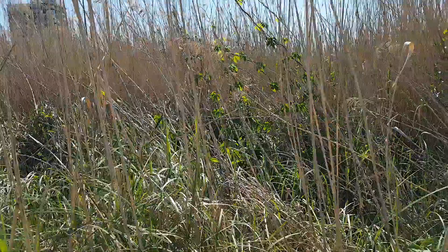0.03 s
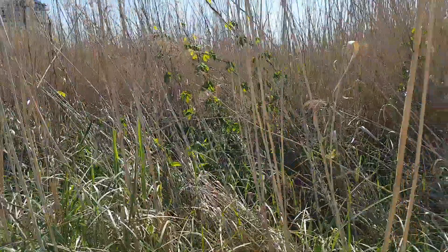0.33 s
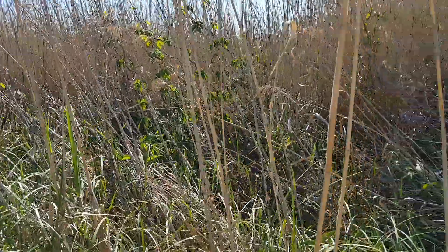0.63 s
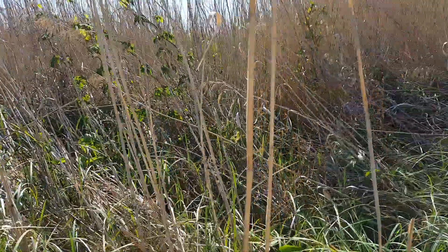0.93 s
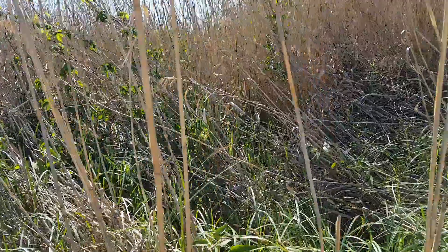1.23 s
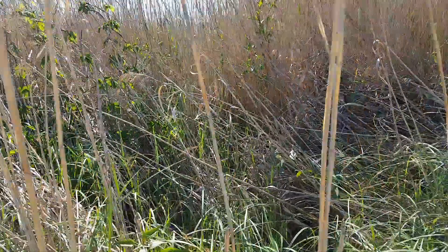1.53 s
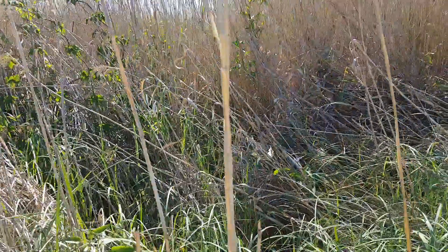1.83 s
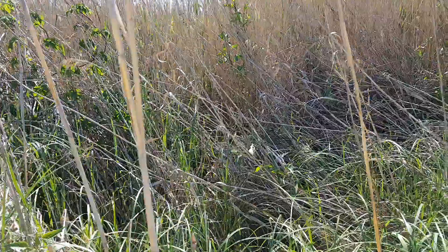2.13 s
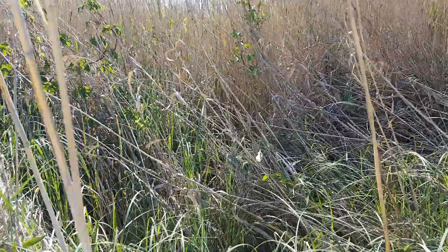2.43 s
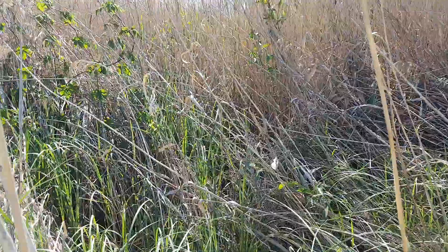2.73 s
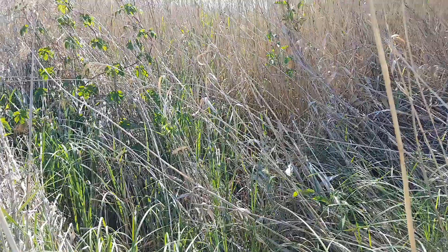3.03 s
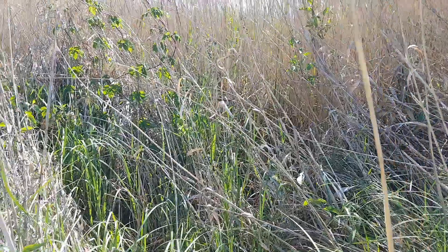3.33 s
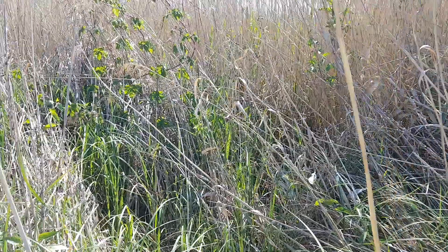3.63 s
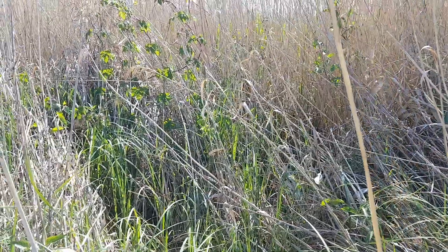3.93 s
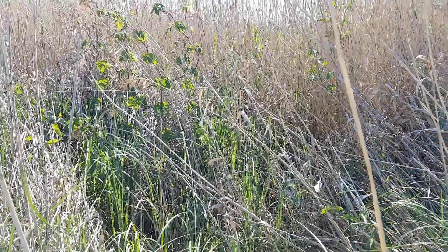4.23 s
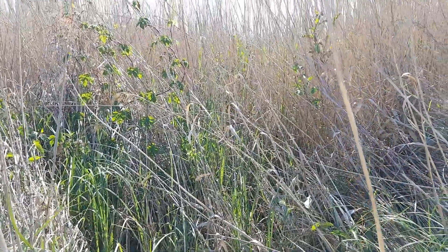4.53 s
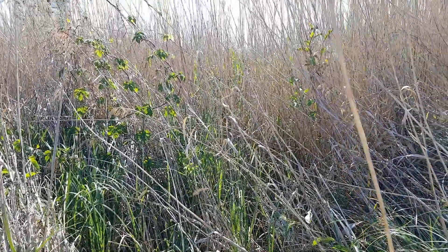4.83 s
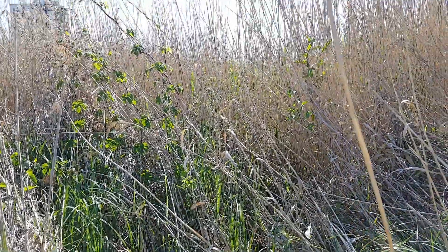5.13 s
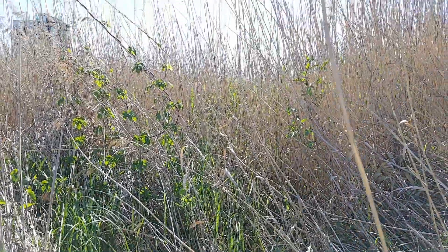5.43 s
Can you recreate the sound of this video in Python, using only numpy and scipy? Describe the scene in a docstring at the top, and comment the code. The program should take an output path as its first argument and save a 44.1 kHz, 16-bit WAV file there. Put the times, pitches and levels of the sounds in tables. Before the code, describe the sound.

A chorus of water frogs croaks from a reed bed beside a lake, heard from the bank. Short, buzzy, rattling calls overlap many times a second without a break, each with a brief echo off the stems. Distant frogs blur into a soft wash with a faint hiss. Dry reeds rustle very faintly a few times, and a quiet low rumble grows about halfway through. The chorus shifts slightly sideways as the microphone turns.

```python
"""A reed bed by a lake: a chorus of water frogs, heard from the bank through slowly turning microphones.
Each croak is a short run of clicks from the vocal cords. The clicks slow down as they go and ring
the frog's swelling vocal sacs, the air pouches beside its mouth. The stems scatter the calls.
A low outdoor rumble, far-off frogs and a faint hiss lie underneath, and now and then dry reeds rustle."""
import sys
import numpy as np
from scipy import signal
from scipy.fft import rfft, irfft
from scipy.io import wavfile
from scipy.ndimage import map_coordinates

SR = 44100
rng = np.random.default_rng(int(sys.argv[2]) if len(sys.argv) > 2 else 0)


def unload_audio(sound):
    """Save the sound as a 16-bit wav file, at the path given as the first command line argument."""
    columns = np.transpose(np.atleast_2d(sound))
    # keep every value between -1 and 1, then stretch to whole-number steps
    steps = np.round(np.clip(columns, -1, 1) * 32767)
    wavfile.write(sys.argv[1], SR, steps.astype(np.int16))


N = 245637


def gain_of(db):
    """Turns decibels (dB) into a number to multiply a sound by."""
    return 10 ** (np.asarray(db) / 20)


def evened(x):
    """Scales a sound to an average power of one."""
    return x / np.sqrt(np.mean(x ** 2) + 1e-20)


def at_pitch(table, hz):
    """Looks up a table by frequency, sliding between rows on a musical (logarithmic) scale."""
    row_hz, value = np.transpose(table)
    return np.interp(np.log(hz + 1), np.log(row_hz + 1), value)


def at_time(table, seconds):
    """Looks up a table by time, sliding between rows."""
    return np.interp(seconds, *np.transpose(table))


def add(mix, start, sound):
    """Mixes a sound in at a start time in seconds."""
    part = mix[max(round(start * SR), 0):][:len(sound)]
    part += sound[:len(part)]


def colour(x, tone, size=4096):
    """Shapes bass and treble by a table of Hz and dB; white noise keeps its power."""
    hz = abs(np.fft.fftfreq(size, 1 / SR))
    log_gain = np.log(evened(gain_of(at_pitch(tone, hz))))
    response = np.exp(np.conj(signal.hilbert(log_gain)))  # rings after a click, never before
    taps = np.fft.ifft(response).real
    return signal.oaconvolve(x, taps[:size // 2])[:N]


def resonate(x, hz, width_hz):
    """Rings at a pitch that can move: shift that pitch down to zero, smooth twice, shift back."""
    turn = np.exp(2j * np.pi * np.cumsum(hz) / SR)
    decay = np.exp(-np.pi * width_hz / SR)
    smoothed = signal.lfilter([(1 - decay) ** 2], [1, -2 * decay, decay * decay], x / turn)
    return (turn * smoothed).real


def swell(progress):
    """A push that builds over the first two fifths, then ebbs; progress runs from 0 to 1."""
    return np.abs(np.sin(np.pi * progress ** 0.79)) ** 0.66


def wash(tone, apart):
    """Shaped noise, partly different at the two microphones."""
    shared, side = (colour(rng.standard_normal(N), tone) for _ in range(2))
    return evened(np.array([shared + apart * side, shared - apart * side]))


def vocal_cords(rate_hz, chance, limp, jitter=.11, shimmer_db=2):
    """One slightly uneven click per opening of the cords; every second click fades, making a rattle."""
    turns = np.cumsum(rate_hz) / SR
    cycle = np.arange(min(int(turns[-1] + .5), len(chance)))
    click_at = np.interp(cycle + .5 + jitter * chance[cycle, 0], turns, np.arange(len(turns)))
    weakening = np.minimum(limp * click_at / len(turns), 1) * (cycle % 2)
    clicks = np.zeros(len(turns))
    clicks[click_at.astype(int)] = gain_of(shimmer_db * chance[cycle, 1]) * (1 - weakening)
    return evened(clicks)


def bounce(x, detour, longest_s=.011, strength=.45):
    """Each frog is also heard by one slightly longer path, off the water and the stems around it."""
    lag = int((.1 + .9 * detour) * longest_s * SR)
    return x + strength * np.pad(x, (lag, 0))[:len(x)]


def vocal_sacs(drive, centre_hz, ring_db=-8):
    """The sacs send out a broad band of sound with a sharper ring at its centre."""
    broad = evened(resonate(drive, centre_hz, width_hz=640))
    ring = evened(resonate(drive, centre_hz, width_hz=170))
    return evened(broad + gain_of(ring_db) * ring)


# How strong the buzz is beside the sacs. Each row: time in seconds, relative level in dB.
BUZZ_LEVEL = [(0, -22.5), (.6, -15.5), (1.1, -12.5), (1.55, -19.5), (2.05, -13), (2.7, -19), (3.5, -16),
              (4.1, -18.5), (4.55, -13), (5.3, -23)]
# A thin high ring shifts as different frogs take the lead. Each row: time in seconds, pitch in Hz.
THIN_RING_PITCH = [(0.3, 3950), (.8, 4590), (1.4, 4790), (2.0, 4200), (2.75, 4860), (4.3, 4260),
                   (5.1, 4790)]


def overtones(drive, start, above_typical_db, sac_hz, centre_hz, size):
    """The buzz of a croak: bare clicks, two overtones that follow the sacs, and a thin high ring."""
    tension = (sac_hz / 2000) ** 3  # a tighter sac has brighter overtones
    lower = gain_of(3) * resonate(drive, 1.5 * centre_hz, width_hz=640)
    highest_db = 8 + 0.47 * above_typical_db  # only carries from near frogs
    highest = gain_of(highest_db) * resonate(drive, 4 * centre_hz, width_hz=1500)
    thin_hz = at_time(THIN_RING_PITCH, start) * (1 + 0.16 * (size - .5))
    thin = gain_of(12) * resonate(drive, np.full(len(drive), thin_hz), width_hz=400)
    buzz_db = at_time(BUZZ_LEVEL, start) + 0.12 * above_typical_db
    return gain_of(buzz_db) * (gain_of(-2.5) * drive + tension * (lower + highest) + thin)


def neighbours(croaks, share=.6, spread_s=.018, softer_db=9, sac_hz=1636):
    """Other frogs join in with some of the loud croaks, adding fainter rows of the same kind."""
    draws = rng.standard_normal((len(croaks), 3))
    joins = rng.random(len(croaks)) < share
    return [(abs(start + spread_s * late), length * np.exp(0.22 * longer),
             db - softer_db, sac_hz * np.exp(0.15 * higher))
            for (start, length, db, _), (late, longer, higher), join in zip(croaks, draws, joins) if join]


# The louder croaks. Each row: start in seconds, length in seconds, relative level in dB, sac pitch in Hz.
CROAKS = [(0.0, 0.12, -31, 1500), (0.093, 0.068, -38, 2030), (0.127, 0.05, -27.5, 1830),
          (0.16, 0.044, -29.2, 2060), (0.204, 0.034, -32.0, 1280), (0.229, 0.062, -31.5, 2260),
          (0.269, 0.066, -25, 2040), (0.354, 0.076, -29, 2190), (0.38, 0.074, -26, 2010),
          (0.44, 0.073, -33.5, 2130), (0.496, 0.073, -23.5, 2065), (0.545, 0.09, -29.5, 1950),
          (0.606, 0.108, -26, 1970), (0.694, 0.051, -34, 2040), (0.732, 0.036, -25.5, 1510),
          (0.758, 0.053, -28.5, 1800), (0.807, 0.057, -28, 1770), (0.888, 0.05, -30, 1750),
          (0.943, 0.081, -25.5, 1820), (1.043, 0.078, -31.5, 1950), (1.085, 0.044, -25.0, 1920),
          (1.161, 0.048, -27, 2020), (1.204, 0.083, -28, 1640), (1.281, 0.048, -28, 2140),
          (1.347, 0.055, -31, 1704), (1.408, 0.055, -28.5, 2200), (1.445, 0.055, -32.5, 1740),
          (1.505, 0.087, -30.5, 2060), (1.602, 0.036, -32, 1590), (1.638, 0.058, -27, 1880),
          (1.692, 0.061, -35.5, 1900), (1.754, 0.074, -29, 1720), (1.828, 0.059, -32.2, 1970),
          (1.869, 0.042, -27, 1710), (1.933, 0.091, -30, 1940), (2.021, 0.052, -30.5, 1920),
          (2.073, 0.06, -30, 2095), (2.11, 0.084, -30.0, 1810), (2.186, 0.101, -30, 1990),
          (2.231, 0.062, -27, 1430), (2.278, 0.18, -29.0, 1494), (2.339, 0.15, -32, 1760),
          (2.504, 0.09, -37, 1570), (2.593, 0.101, -27, 1760), (2.685, 0.128, -27.5, 1550),
          (2.739, 0.068, -23.5, 2016), (2.785, 0.14, -30.5, 1530), (2.861, 0.065, -24.5, 2060),
          (2.93, 0.094, -30, 1630), (2.971, 0.12, -26.5, 1984), (3.051, 0.136, -26.5, 1950),
          (3.143, 0.092, -25.0, 1945), (3.208, 0.044, -26, 1560), (3.246, 0.052, -24.5, 1494),
          (3.29, 0.057, -25.5, 1715), (3.333, 0.078, -28, 1445), (3.347, 0.14, -30, 1760),
          (3.497, 0.052, -22.5, 1880), (3.535, 0.047, -29.5, 1700), (3.593, 0.094, -29.5, 1990),
          (3.636, 0.045, -24, 1940), (3.706, 0.036, -30, 1580), (3.734, 0.058, -30, 2430),
          (3.753, 0.096, -24.5, 1654), (3.844, 0.046, -29, 2430), (3.875, 0.082, -24.5, 1770),
          (3.952, 0.062, -28, 2480), (3.991, 0.088, -24.5, 1976), (4.076, 0.05, -27, 2490),
          (4.122, 0.06, -21.5, 2060), (4.165, 0.13, -26.5, 1750), (4.214, 0.117, -30.5, 2010),
          (4.254, 0.047, -24.5, 2390), (4.35, 0.032, -27, 1550), (4.382, 0.047, -23.5, 2380),
          (4.499, 0.072, -27.5, 2420), (4.563, 0.11, -41.5, 1520), (4.621, 0.055, -26.5, 2240),
          (4.668, 0.074, -29, 1790), (4.727, 0.083, -27.5, 1850), (4.819, 0.066, -26, 2050),
          (4.942, 0.068, -25.0, 1984), (4.95, 0.139, -33, 2030), (5.07, 0.058, -23.5, 1960),
          (5.088, 0.16, -33.5, 2040), (5.113, 0.042, -28.5, 1390), (5.19, 0.057, -24.5, 1920),
          (5.257, 0.041, -29, 1390), (5.312, 0.061, -29.0, 1900), (5.438, 0.07, -31.0, 1870)]
# The tone of the dull throat. Each row: frequency in Hz, boost or cut in dB.
THROAT_TONE = [(150, -55), (255, -25), (335, -2.5), (430, -6), (560, -1.5), (800, -.5), (1050, 0),
               (1350, 3), (2000, -8), (3000, -30), (6000, -65)]
# The tone of the buzz. Each row: frequency in Hz, boost or cut in dB.
BUZZ_TONE = [(500, -47), (1500, 19.5), (2700, -18), (3300, 15), (3800, 2.5), (4600, -2.5), (5200, -13.5),
             (7000, -13.5), (9500, -10.5), (12000, -22.5)]
# The whole call is weak in deep bass and high treble. Each row: frequency in Hz, boost or cut in dB.
CALL_TONE = [(40, -24), (190, -8.5), (300, -3.5), (3500, -0.5), (4800, 0.5), (5300, -8.5), (6000, -15.5),
             (7000, -24), (9800, -18.5), (12500, -36)]


def frogs(click_hz=377.5, typical_db=-32, typical_sac_hz=2080):
    """In every croak the vocal cords drive the ringing sacs, the dull throat and a buzz of overtones."""
    sacs, throat, buzz = np.zeros((3, N))
    croaks = list(CROAKS) + neighbours(CROAKS)
    chances = rng.standard_normal((len(croaks), 80, 2))
    quirks, moods = rng.random((len(croaks), 3)), rng.standard_normal((len(croaks), 2))
    air = rng.standard_normal(N + SR)
    for croak, chance, (limp, detour, size), (haste, bend) in zip(croaks, chances, quirks, moods):
        start, length, db, sac_hz = croak
        progress = np.linspace(0, 1, int(length * SR))
        push = gain_of(db) * swell(progress)
        # as the push of air runs out, the buzz slows into separate ticks
        rate_hz = click_hz * np.exp(.2 * haste) / (1 + 1.8 * progress ** 4.5)
        clicks = vocal_cords(rate_hz, chance, 1.2 * limp)
        # a little puff of rushing air follows each opening of the cords
        openings = signal.lfilter([1], [1, -np.exp(-1000 / SR)], clicks)
        puffs = openings * air[int(start * SR):][:len(clicks)]
        drive = evened(bounce(clicks + .22 * evened(puffs), detour))
        # most croaks rise in pitch, lower sacs more so; some hold or fall
        glide = .07 - .3 * np.log2(sac_hz / typical_sac_hz) + .16 * bend
        centre_hz = sac_hz * (1 + glide * (progress - .4))
        add(sacs, start, push * vocal_sacs(drive, centre_hz))
        # low notes carry farther and bounce once more, so a faint, far frog has more throat and less buzz
        above_typical_db = db - typical_db
        throat_db = -6.5 - 0.47 * above_typical_db
        add(throat, start, push * gain_of(throat_db) * evened(bounce(drive, size)))
        add(buzz, start, push * overtones(drive, start, above_typical_db, sac_hz, centre_hz, size))
    return .5 * colour(sacs + colour(throat, THROAT_TONE) + colour(buzz, BUZZ_TONE), CALL_TONE)


# The microphones turn. Each row: time in seconds, head start of the left one in milliseconds.
LEFT_LEAD = [(0, -0.06), (.6, -0.024), (1.35, 0.13), (1.8, 0.097), (2.55, 0.077), (2.8, 0.045),
             (3.15, 0.0081), (3.4, -0.046), (4.5, -0.02), (5.5, -0.058)]


def direct_sound(calls):
    """The calls reach one microphone a moment before the other."""
    samples = np.arange(N)
    lead = at_time(LEFT_LEAD, samples / SR) * SR / 1000
    return np.array([map_coordinates(calls, [samples + side * lead / 2], order=3) for side in (1, -1)])


def echoes(fade_times, tone, delay_s=0.00097, per_second=4000):
    """A cloud of tiny echoes for each microphone; a table sets how fast each frequency dies away."""
    signs = rng.choice([-1., 1.], (2, SR // 2))
    taps = signs * (rng.random((2, SR // 2)) < per_second / SR)
    hz, seconds, bands = signal.stft(taps, SR, nperseg=128)
    faded = bands * gain_of(-60 * seconds / at_pitch(fade_times, hz)[:, None])
    plain = signal.istft(faded, SR)[1]
    shaped = signal.istft(faded * gain_of(at_pitch(tone, hz))[:, None], SR)[1]
    cloud = shaped / np.linalg.norm(plain, axis=1, keepdims=True)
    return np.pad(cloud, ((0, 0), (int(delay_s * SR), 0)))


# How long the reed bed rings. Each row: frequency in Hz, seconds to fade by 60 dB.
REED_FADE_TIMES = [(300, 0.63), (2000, 0.31), (4500, 0.95), (9000, 0.13)]
# Stems scatter treble most. Each row: frequency in Hz, boost or cut in dB.
SCATTER_TONE = [(400, -21), (900, -7), (2000, -13.5), (4000, 1.5), (9000, 0)]


def reed_bed(calls, near_fade_s=0.024, clouds=5, clouds_per_s=4):
    """The whole bed adds a short tail; near stems smear each click differently as the microphones move."""
    tail = echoes(REED_FADE_TIMES, tone=[(300, -26.5), (2000, -15)], delay_s=0.0075)
    scattered = signal.oaconvolve(calls[None], tail, axes=1)[:, :N]
    place = np.arange(N) / SR * clouds_per_s
    for cloud in range(clouds):
        distance = abs((place - cloud + 1) % clouds - 1)
        share = np.cos(np.pi / 2 * np.minimum(distance, 1))  # each cloud blends into the next
        near_stems = echoes([(1000, near_fade_s)], SCATTER_TONE)
        scattered += signal.oaconvolve((calls * share)[None], near_stems, axes=1)[:, :N]
    return scattered


# The tone of the rumble. Each row: frequency in Hz, boost or cut in dB.
RUMBLE_TONE = [(20, -11.5), (42, -10.5), (58, 5), (80, -3.5), (150, -0.5), (230, -6.5), (500, -6.5),
               (1200, -46.5)]
# How loud the rumble is. Each row: time in seconds, level in dB.
RUMBLE_LEVEL = [(0, -63), (1.0, -66.5), (1.8, -66.5), (2.3, -61), (2.8, -53), (3.3, -54.5), (5.57, -55)]


def outdoor_rumble():
    """Low noise, nearly the same on both sides, that grows louder about halfway through."""
    return gain_of(at_time(RUMBLE_LEVEL, np.arange(N) / SR)) * wash(RUMBLE_TONE, apart=.18)


# The tone of far-off frogs. Each row: frequency in Hz, boost or cut in dB.
FAR_CHORUS_TONE = [(250, -33), (400, -7.5), (1000, -2.5), (1900, -1.5), (2600, -14), (4400, -8.5),
                   (6000, -42)]


def far_chorus(level_db=-55):
    """Far-off frogs blur into one steady wash of noise."""
    return gain_of(level_db) * wash(FAR_CHORUS_TONE, apart=.4)


# The tone of the hiss. Each row: frequency in Hz, boost or cut in dB.
HISS_TONE = [(200, -9), (2000, 11), (5000, 2.5), (7000, -4), (11500, -2), (15500, -2)]


def faint_hiss(level_db=-66):
    """A steady hiss, different on each side."""
    return gain_of(level_db) * wash(HISS_TONE, apart=1.0)


# Dry stems rustle close by. Each row: start in seconds, length in seconds, level in dB.
RUSTLES = [(0.991, 0.8, -69), (1.804, 0.4, -69.5), (3.02, .22, -69)]
# The bright tone of their snaps. Each row: frequency in Hz, boost or cut in dB.
SNAP_TONE = [(1000, -30), (4000, 1), (9000, -2.5), (15500, 0.5)]


def rustling_reeds(snaps_per_s=500, spread_db=4):
    """Dry stems brush each other in short swells of tiny snaps."""
    push = np.zeros(N)
    for start, length, db in RUSTLES:
        add(push, start, gain_of(db) * swell(np.linspace(0, 1, int(length * SR))))
    snaps = rng.random((2, N)) < snaps_per_s / SR
    strength = gain_of(spread_db * np.minimum(rng.exponential(1, (2, N)), 4))
    return push * evened(np.array([colour(side, SNAP_TONE) for side in snaps * strength]))


def scene():
    """The frogs and their echoes, over the rumble, far chorus, hiss and rustling reeds."""
    calls = frogs()
    chorus = gain_of(0.51) * (direct_sound(calls) + reed_bed(calls))
    return chorus + outdoor_rumble() + far_chorus() + faint_hiss() + rustling_reeds()


def record(dry, bass_tilt_db=-1.8, treble_tilt_db=0.63, cutoff_hz=15800):
    """The right microphone has more bass, the left is a little brighter; both lose the highest treble."""
    tilt_db = at_pitch([(350, bass_tilt_db), (1800, treble_tilt_db)], np.fft.rfftfreq(N, 1 / SR))
    heard = irfft(rfft(dry) * gain_of(np.array([tilt_db, -tilt_db]) / 2), N)
    treble_cut = signal.firwin(511, cutoff_hz, window=("kaiser", 9), fs=SR)
    return signal.oaconvolve(heard, treble_cut[None], "same")


dry = scene()
out = record(dry)
unload_audio(out)
```